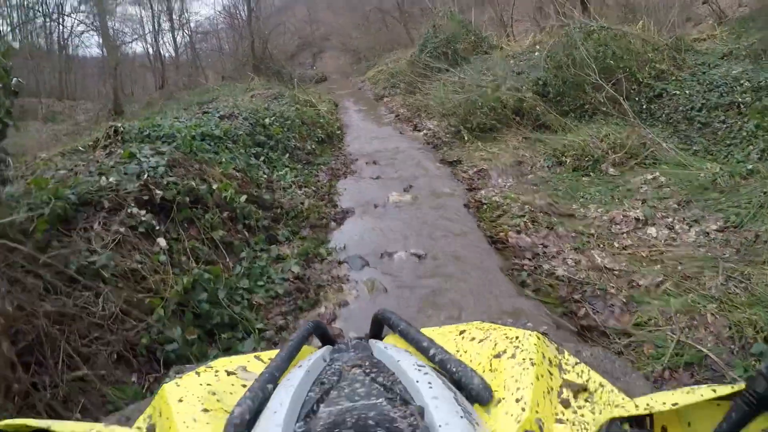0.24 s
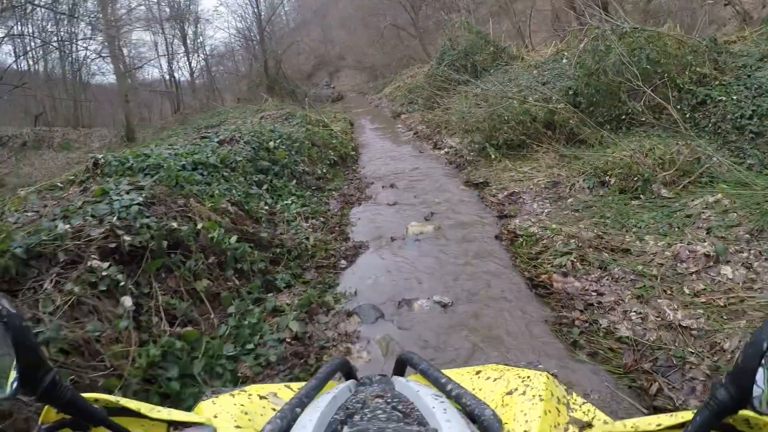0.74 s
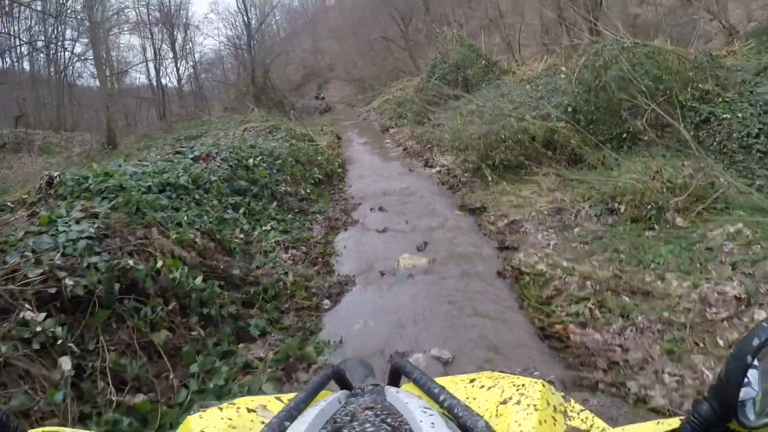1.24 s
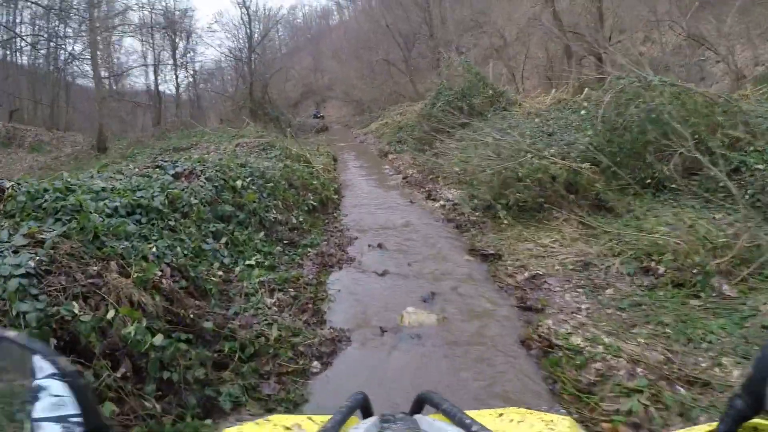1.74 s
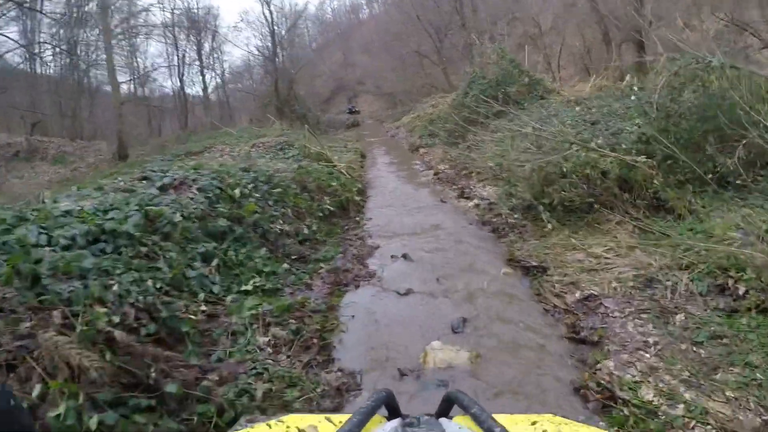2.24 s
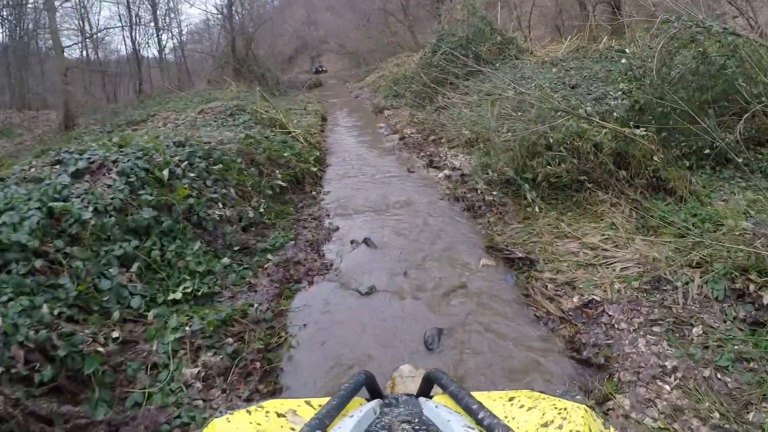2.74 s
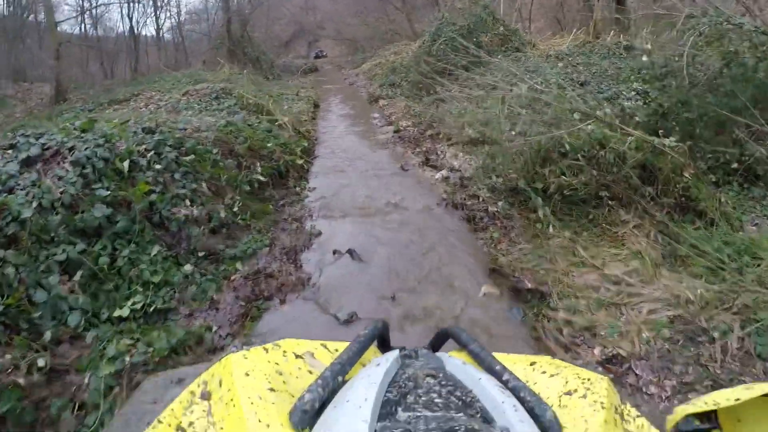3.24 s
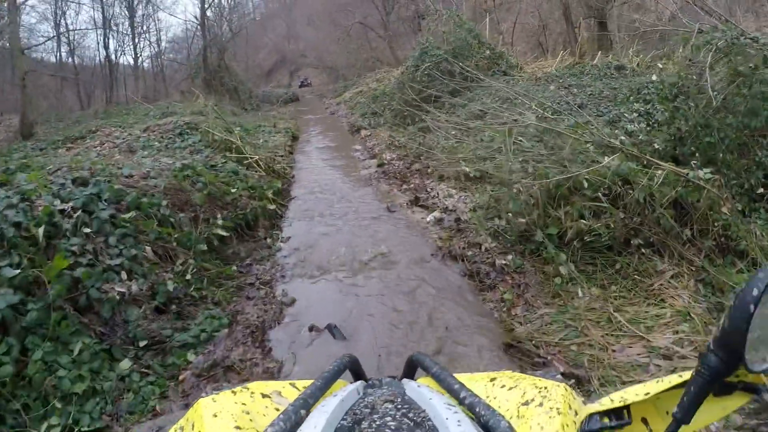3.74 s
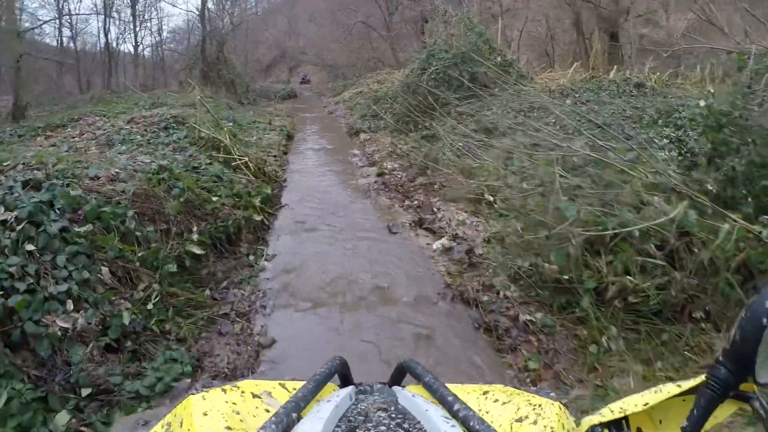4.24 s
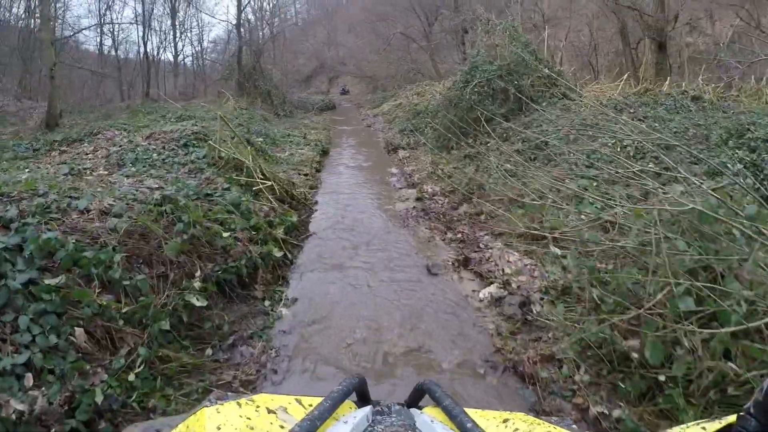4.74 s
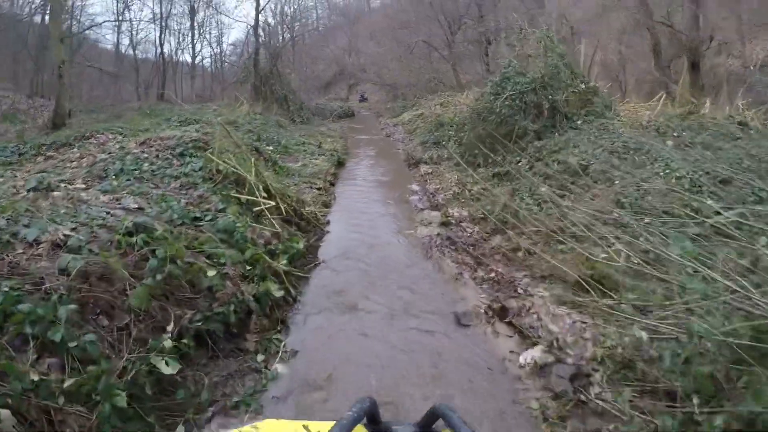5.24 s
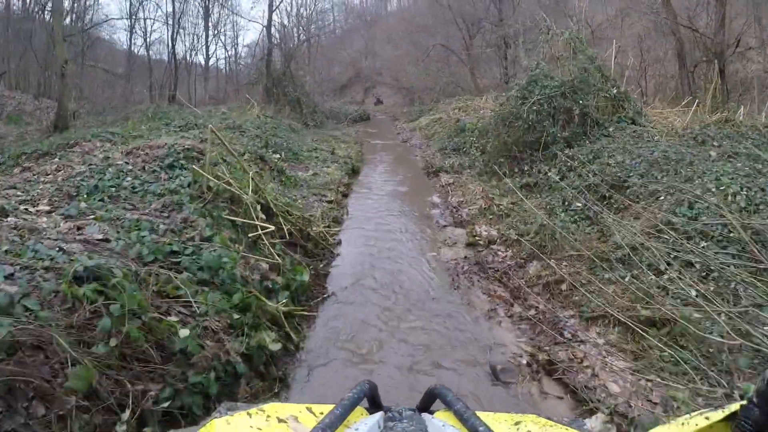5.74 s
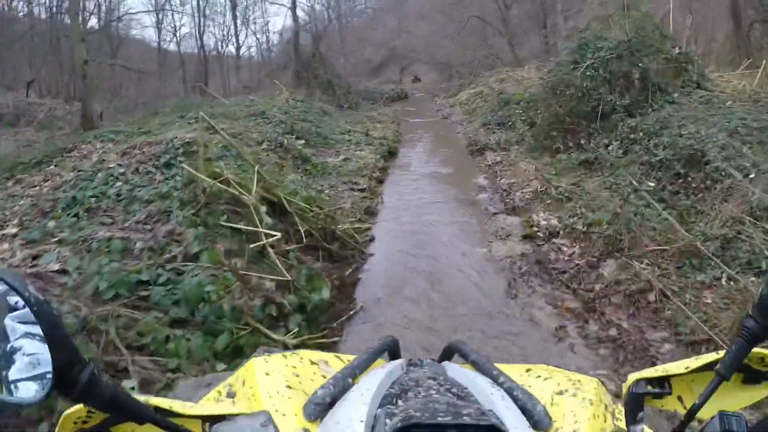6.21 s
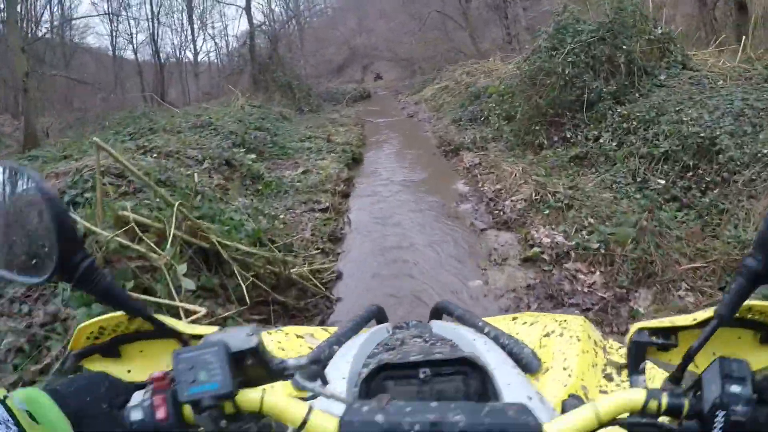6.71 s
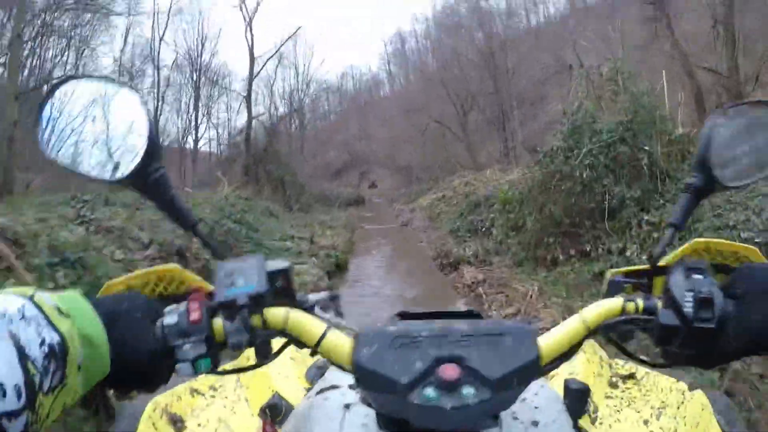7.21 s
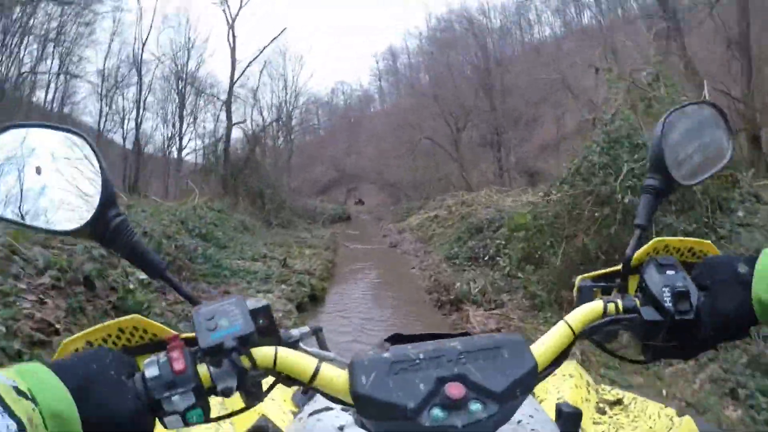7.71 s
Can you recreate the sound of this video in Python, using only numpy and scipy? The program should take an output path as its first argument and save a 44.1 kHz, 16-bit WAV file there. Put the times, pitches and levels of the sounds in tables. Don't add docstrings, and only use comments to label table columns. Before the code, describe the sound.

A quad bike crawls up a shallow muddy woodland stream. A low, uneven engine throb surges and sags with the throttle under a steady wash of churned water. Wheels thud on stones, panels rattle and water slaps the mudguards. In the last few seconds the revs climb and the splashing thickens. The microphone rides on the machine in a sealed housing, close, boxy and muffled.

```python
import sys
import numpy as np
from scipy import signal
from scipy.fft import rfft, irfft, next_fast_len
from scipy.io import wavfile
from scipy.ndimage import uniform_filter1d

SR = 44100
rng = np.random.default_rng(int(sys.argv[2]) if len(sys.argv) > 2 else 0)


def volts_from_decibels(level):
    exponent = np.asarray(level, float) / 20
    return 10 ** exponent


def put_to_file(sound):
    columns = np.atleast_2d(sound).T
    safe = np.clip(columns, -1, 1)
    whole_steps = np.round(safe * 32767)
    wavfile.write(sys.argv[1], SR, whole_steps.astype(np.int16))


N = 351477
TIME = np.arange(N) / SR
SIZE = next_fast_len(N + SR // 4)
HZ = np.maximum(np.arange(SIZE // 2 + 1) * SR / SIZE, 1)


def curves(table):
    s, *columns = np.transpose(table)
    return [np.interp(TIME, s, column) for column in columns]


def over_hz(table):
    hz, *columns = np.transpose(table)
    return [np.interp(np.log(HZ), np.log(hz), column) for column in columns]


def through(x, gain):
    return irfft(rfft(x, SIZE) * gain, SIZE)[..., :N]


def causal(db):
    cepstrum = irfft(np.log(volts_from_decibels(db)), SIZE)
    cepstrum[1:SIZE // 2] *= 2
    cepstrum[SIZE // 2 + 1:] = 0
    return np.exp(rfft(cepstrum))


def band(hz, width):
    return 1 / (1 + 1j * (HZ ** 2 - hz ** 2) / (HZ * width))


def unit(x):
    return x / np.sqrt(np.mean(x ** 2, axis=-1, keepdims=True))


def walk(rate):
    k = int(SR / rate)
    held = np.repeat(rng.standard_normal(N // k + 1), k)
    slewed = uniform_filter1d(uniform_filter1d(held, k), k)
    return unit(slewed[:N])


def bursts(table, rise_s, fall_s, rings=False):
    out, t = np.zeros(N + SR), np.arange(SR // 5) / SR
    shape = (1 - np.exp(-t / rise_s)) * np.exp(-t / fall_s)
    for s, db, *hz in table:
        start = int(s * SR)
        tone = np.sin(2 * np.pi * hz[0] * t) if rings else 1
        out[start:start + len(t)] += volts_from_decibels(db) * shape * tone
    return out[:N]


# start in seconds, four-stroke cycle rate asked for in Hz.
THROTTLE = [(0.0, 13.83), (0.82, 19.53), (1.04, 15.56), (1.44, 18.3), (1.72, 19.6), (2.04, 14.1),
            (2.74, 21.32), (3.24, 15.97), (3.72, 18.11), (4.02, 16.45), (4.37, 18.79), (4.6, 15.25),
            (4.9, 19.5), (5.02, 23.3), (5.17, 19.8), (5.36, 21.2), (5.63, 23.48), (6.32, 24.6),
            (6.57, 26.2), (6.85, 26.95), (7.09, 26.3), (7.52, 27.24), (7.76, 28.3)]
START_HZ, CRAWL_HZ = 17.85, 18
PICK_UP_S, SAG_S = .088, .215


def cycle_hz():
    out, now = np.zeros(N), START_HZ
    for (s, goal), (end, _) in zip(THROTTLE, THROTTLE[1:] + [(N / SR, 0)]):
        start, stop = round(s * SR), round(end * SR)
        since = np.arange(stop - start) / SR
        part = goal + (now - goal) * np.exp(-since / (PICK_UP_S if goal > now else SAG_S))
        out[start:stop] = part
        now = part[-1]
    return uniform_filter1d(out, size=SR // 20)


# multiple of the cycle, left level in dB, right level in dB.
STRONG_ORDERS = [(2, 0, 0), (3, -7, -8), (4, -7, -15.5), (5, -9, -9)]
# multiple of the cycle, left level in dB, right level in dB.
WEAK_ORDERS = [(1, -51, -31), (6, -66, -40.5), (7, -60, -47.5), (8, -52, -46.5), (10, -68, -51),
               (12, -52.5, -54.5)]
WEAK_DB_PER_HZ = 0.03
# frequency in Hz, left level in dB, right level in dB.
MOUNT = [(27.8, -38.5, -37), (32.7, -24, -23), (48.4, -29, -20), (61.4, -33, -40.5), (71.7, -30, -17.5),
         (89.8, -29.5, -15), (106, -63, -14), (128, -36.5, -31)]
# time in seconds, firmness in dB,
# second order at the left in dB, second order at the right in dB.
GRIP = [(0.12, 0.5, -19, 7.5), (0.36, -4, 5, 3), (0.5, 0.5, 0, 8.5), (0.85, -4, -16, -1), (1.0, -1, -2, 6),
        (1.2, -1, -6, 6), (1.55, -3, -8, 0), (1.72, -4, 1, 2), (2.05, 2.5, -6, -4), (2.3, 1, 4, 6.5),
        (2.75, -1, -7, -5.5), (3.05, -6, 11.5, 4), (3.35, -2, 6.5, 5), (3.75, 2, -12, 6.5),
        (4.2, -4, -20, 3), (4.7, -0.5, -6, 11.5), (5.05, 1.5, -2, 8), (5.2, -4.5, 10, 3.5),
        (5.7, -4, 8, -3.5), (6.4, -1, 4, -1.5), (6.7, -1.5, -5, 3.5), (7.3, -3, 2, -2),
        (7.41, 5.5, -8, -12), (7.48, 2, -11, -4), (7.97, -1.5, -3, 5)]
# time in seconds, third, fourth and fifth order in dB.
LOAD = [(0.0, 5, -1, -0.5), (0.3, -3, -6, 0.5), (0.6, -7, 0, 1), (0.8, -2, -8, 3), (1.0, 3, 7, 3.5),
        (1.4, 5, 1, -2), (1.7, 2, 4.5, 4.5), (2.0, 8, 1.5, -5.5), (2.3, -8, 4, -6.5), (2.6, 1, -7, -2.5),
        (2.85, -22, -8, 1), (3.1, 7, 9, 0.5), (3.4, 3, 2, -3), (3.7, 2, 0, -2), (4.0, -3, 2, 1.5),
        (4.5, 4, 2, 4), (4.9, 0, -3, -5), (5.1, -4, -2, 2.5), (5.4, 14, 9.5, 1.5), (5.8, 2, 0, 2.5),
        (6.1, 1.5, 1, -7), (6.5, 0, -3, 1), (6.9, 3, 3.5, -7), (7.4, 1, -0.5, 5.5), (7.97, 2.5, -11, 2)]


def engine():
    hz, (firm_db, left_db, right_db) = cycle_hz(), curves(GRIP)
    turn = 2 * np.pi * np.cumsum(hz * (1 + .005 * walk(9))) / SR
    mount_hz, *passed = np.transpose(MOUNT)

    def mount(side, multiple):
        return np.interp(np.log(multiple * hz), np.log(mount_hz), passed[side]) + firm_db

    extra_db = [(left_db, right_db)] + [(db, db) for db in curves(LOAD)]
    orders = []
    for (k, left, right), (more_left, more_right) in zip(STRONG_ORDERS, extra_db):
        orders.append((k, left + more_left + mount(0, k), right + more_right + mount(1, k)))
    rise_db = WEAK_DB_PER_HZ * (hz - CRAWL_HZ)
    for k, left, right in WEAK_ORDERS:
        orders.append((k, left + (k > 1) * rise_db, right + (k > 1) * rise_db))
    out = 0
    for k, *levels in orders:
        rough_db = 1.2 if k == 2 else 2.7 if k in (3, 4, 5) else 3
        right_lag = 1.18 + (.15 if k == 2 else .5) * walk(1.513)
        lag = np.array([np.zeros(N), right_lag]) + rng.uniform(0, 2 * np.pi)
        gain = []
        for db in levels:
            rough = rough_db * walk(10 if k < 6 else 3)
            gain.append(volts_from_decibels(db + rough + (k > 5) * 1.2 * walk(3)))
        out = out + np.sqrt(2) * np.array(gain) * np.sin(k * turn + lag)
    return out


# time in seconds, rumble level in dB.
BED = [(0.35, -35.5), (0.65, -39), (1.0, -32), (1.35, -38), (1.75, -31.5), (2.35, -41.5), (3.0, -32),
       (3.4, -38), (3.6, -34.5), (4.15, -38), (5.1, -35.5), (5.6, -37.5), (5.9, -30), (6.25, -35.5),
       (6.65, -34.5), (7.0, -30), (7.4, -33), (7.9, -31.5)]
RIGHT_RUMBLE_DB = 4
# frequency in Hz, density in dB per Hz.
RIDE_LEFT = [(15, 22), (30, 20), (60, 11), (110, 5), (160, 1), (230, -1), (400, -1), (490, -14), (750, -23),
             (1500, -60)]
# frequency in Hz, density in dB per Hz.
RIDE_RIGHT = [(15, 16), (30, 15), (60, 10), (110, 5), (160, -1), (230, -7), (400, -12), (490, -18),
              (750, -28), (1500, -60)]
MOUNT_HZ, MOUNT_WIDTH_HZ, MOUNT_DB = 570., 30., -29
STRUT_HZ, STRUT_WIDTH_HZ, STRUT_DB = 324, 59, -12


def ride():
    db = curves(BED)[0] + np.array([[0], [RIGHT_RUMBLE_DB]])
    lumps = rng.standard_normal((2, N)) * volts_from_decibels(np.array([3.0 * walk(20), 2.0 * walk(20)]))
    slow = rng.standard_normal((2, N)) * volts_from_decibels(np.array([2.0 * walk(2.5), 1.0 * walk(3.5)]))
    colour = volts_from_decibels(np.array(over_hz(RIDE_LEFT) + over_hz(RIDE_RIGHT)))
    colour = colour / np.sqrt(np.mean(colour ** 2 * (HZ > 110), axis=1, keepdims=True))
    upper = np.clip(np.log2(HZ / 45), 0, 1)
    rumble = through(unit(lumps), colour * upper) * volts_from_decibels(db - 4.5)
    sway = through(unit(slow), colour * (1 - upper)) * volts_from_decibels(.5 * (db + 35.5) - 36.5)
    ring = unit(through(lumps[0], band(MOUNT_HZ, MOUNT_WIDTH_HZ))) * volts_from_decibels(.7 * db[0] + MOUNT_DB + 8)
    strut = unit(through(lumps[1], band(STRUT_HZ, STRUT_WIDTH_HZ) ** 2)) * volts_from_decibels(db[0] + STRUT_DB)
    swing = np.exp(-TIME / [[.06], [.015]]) * np.cos(2 * np.pi * TIME * [[18], [29]])
    lurch = np.array([[-.37], [-.8]]) * swing
    return rumble + sway + ring * np.array([[1], [-1.1]]) + strut * np.array([[1], [-.4]]) + lurch


# time in seconds, added churn in dB.
DEPTH = [(0.0, -1), (0.2, 1.5), (0.4, 2.5), (0.76, 1), (1.1, 1.5), (1.33, 1.5), (1.9, -1), (2.1, 0),
         (2.4, -1), (2.9, 1), (3.45, 0), (4.4, 1.5), (5.1, -1), (6.4, -0.5), (7.03, 1), (7.4, 1),
         (7.62, -0.5), (7.97, 1)]
# time in seconds, added spray in dB.
SPRAY = [(0.0, 0.5), (0.45, 1), (0.75, 1), (1.1, 0), (1.35, -1.5), (1.75, 0), (2.15, -1.5), (2.6, -2),
         (2.72, 0), (2.8, 0), (3.4, -1.5), (3.9, 0.5), (4.1, -1.5), (4.9, 0), (5.1, -1), (5.65, -3),
         (5.78, 0), (6.3, -0.5), (6.6, 1), (7.97, -1)]
CHURN_DB_PER_HZ, SPRAY_DB_PER_HZ = 0.69, 0.64
SPRAY_STONE_SHARE, WHEELS_SMOOTH_S = .15, .7


def splash():
    faster, depth_db, stones_db = cycle_hz() - CRAWL_HZ, curves(DEPTH)[0], curves(BED)[0]
    churn_db = CHURN_DB_PER_HZ * faster + depth_db
    rolling = uniform_filter1d(faster, size=int(WHEELS_SMOOTH_S * SR))
    spray_db = SPRAY_DB_PER_HZ * rolling + curves(SPRAY)[0] + SPRAY_STONE_SHARE * (stones_db + 45.5)
    size = volts_from_decibels(2.7 * np.minimum(rng.exponential(size=(2, N)), 4))
    drops = (rng.random((2, N)) < 700 / SR) * size
    puffs = signal.lfilter([1], [1, -.975], drops) * rng.standard_normal((2, N))
    spectrum = rfft(rng.standard_normal((2, N)) + 0.57 * unit(puffs), SIZE)
    out, swell = 0, walk(8.8)
    for hz in 450 * 2 ** (np.arange(10) * .55):
        part = np.cos(np.pi / 2 * np.clip(np.log2(HZ / hz) / .55, -1, 1)) ** 2
        high = np.clip(np.log2(hz / 2000.), 0, 1)
        follow = np.clip(hz / 1070.0, .4, 1)
        wash_db = (1 - high) * follow * (churn_db + 0.18)
        top_db = high * (spray_db - .6) * (.55 if hz > 11000 else 1)
        flicker_db = 0.45 * swell + 1.1 * walk(14) + 0.13 * walk(3)
        out = out + volts_from_decibels(wash_db + top_db + flicker_db) * irfft(spectrum * part, SIZE)[:, :N]
    return out


BUZZ_HZ, BUZZ_WIDTH_HZ = 1480, 92
BUZZ_DB, BUZZ_DB_PER_HZ = 0.5, -1.8
BUZZ_CYCLES, BUZZ_PHASE = .25, .28


def buzz():
    hz = cycle_hz()
    cycles = np.cumsum(hz) / SR + BUZZ_PHASE
    size_db = 2 * rng.standard_normal(N // 1000)[cycles.astype(int)]
    level_db = BUZZ_DB + size_db + BUZZ_DB_PER_HZ * (hz - CRAWL_HZ)
    puff = np.exp(-(cycles % 1) / BUZZ_CYCLES) * volts_from_decibels(level_db)
    return np.array([through(puff * rng.standard_normal(N), band(BUZZ_HZ, BUZZ_WIDTH_HZ)), np.zeros(N)])


# start in seconds, length in seconds,
# first frequency in Hz, last frequency in Hz, level in dB.
GURGLES = [(0.0, 0.19, 2085, 2022, 4), (0.926, 0.26, 1557, 1625, -0.5), (1.005, 0.24, 2210, 2125, -3),
           (7.501, 0.54, 2120, 2086, 0), (2.617, 0.31, 1650, 1616, 0), (2.85, 0.15, 2066, 2160, -1),
           (2.958, 0.32, 1675, 1816, -1.5), (4.202, 0.19, 2176, 2050, 0), (4.951, 0.57, 1768, 1740, -4.5),
           (5.706, 0.19, 2160, 2106, -3), (6.545, 0.33, 2245, 2102, 7), (6.858, 0.47, 1626, 1740, 5),
           (6.905, 0.43, 2110, 2215, 5.5), (7.453, 0.6, 1680, 1839, 6.5)]
GURGLE_WIDTH_HZ, GURGLE_DB = 134, -15.5


def gurgle():
    out = np.zeros(N)
    flutter = through(rng.standard_normal((2, N)), 1 / (1 + (2 * HZ / GURGLE_WIDTH_HZ) ** 2))
    flutter = unit(flutter[0]) + 1j * unit(flutter[1])
    for s, length, from_hz, to_hz, db in GURGLES:
        share = np.clip((TIME - s) / length, 0, 1)
        turn = 2 * np.pi * np.cumsum(from_hz + (to_hz - from_hz) * share) / SR
        swell = np.sqrt(np.sin(np.pi * share).clip(0))
        out += volts_from_decibels(db + GURGLE_DB) * swell * np.real(flutter * np.exp(1j * turn))
    return np.array([out, np.zeros(N)])


# start in seconds, level in dB, ring frequency in Hz.
RATTLES = [(0.0324, -25, 2070), (0.0474, -25, 2070), (0.0694, -25, 2010), (0.1186, -25, 1850),
           (0.1394, -25, 2050), (0.2054, -25, 1640), (0.704, -24, 1690), (0.719, -20, 1680),
           (0.641, -23, 1670), (0.498, -22, 1680), (0.937, -22, 1640), (0.4599, -20, 1570),
           (0.5707, -27, 1670), (0.7477, -16, 1550), (0.7891, -17, 1690), (0.8535, -18, 1650),
           (0.8999, -16, 1650), (0.9065, -17, 1680), (0.9657, -21, 1570), (1.4272, -20, 1650),
           (2.0298, -16, 1630), (2.6479, -22, 1650), (2.7172, -16, 1640), (2.7796, -17, 1650),
           (3.0036, -21, 1810), (3.5768, -17, 1730), (5.0804, -23, 1760), (6.3724, -20, 1600),
           (6.5939, -22, 2130), (6.6393, -20, 2170), (6.6618, -20, 2180), (6.7491, -19, 2070),
           (6.8169, -18, 1820), (6.9406, -18, 1650), (7.66, -20, 1710), (0.387, -22, 1690),
           (1.7569, -26, 1640), (2.1321, -25, 2200), (2.5102, -27, 1630), (3.1757, -24, 1820),
           (4.3066, -20, 2060), (5.7104, -23, 1670), (6.3315, -23, 1740), (6.9636, -19, 1620)]
# start in seconds, level in dB, frequency in Hz.
TICKS = [(3.6827, -20, 1590), (3.7416, -29, 1630), (3.9216, -27, 1530), (3.9975, -25, 1650),
         (4.0533, -26, 1570), (4.1377, -35, 1550), (4.195, -20, 1580), (4.2519, -22, 1800),
         (4.3088, -22, 1630), (4.3502, -20, 1600), (4.409, -26, 1550), (4.4654, -20, 1600),
         (4.5632, -25, 1680), (4.5931, -22, 1620), (4.6485, -34, 1760), (4.7084, -23, 1580),
         (4.7672, -20, 1550), (4.9757, -24, 1570), (5.0062, -23, 1594), (5.0486, -21, 1800),
         (1.1028, -25, 1620), (1.2156, -31, 1550), (1.4276, -27, 1660), (1.46, -20, 1680),
         (1.5563, -27, 1670), (1.7149, -23.5, 1680), (1.7578, -35, 1650), (1.8431, -28, 1580),
         (1.9873, -32, 1620), (2.0292, -40, 1570), (2.0686, -32, 1680), (2.1854, -27, 1530),
         (2.3385, -34, 1770), (2.4044, -32, 1720), (2.5106, -25, 1635), (2.5735, -37, 1720),
         (5.2231, -26, 1740), (5.3338, -20, 1570), (5.7104, -34, 1670), (5.8002, -22, 1770),
         (5.89, -30, 1580), (5.9579, -23, 1710), (6.2018, -21, 1640), (6.2457, -23, 1590),
         (6.3001, -21, 1710), (6.3315, -26, 1740), (6.3724, -26, 1600), (6.5934, -20, 2130),
         (6.7331, -20, 2060), (6.8169, -31, 1820), (6.9406, -37, 1650), (7.0654, -15, 1670),
         (7.3123, -17, 1690), (7.4146, -26, 1680), (7.5667, -11.5, 1720), (7.66, -33, 1710),
         (7.7219, -20, 1660), (7.9, -15, 1810)]
TICK_DB = -1
# start in seconds, level in dB, hollow part relative to it in dB.
SLAPS = [(0.387, -52, -34), (0.896, -27.5, 0), (1.075, -36.5, 3), (1.546, -38, -4), (2.029, -37.5, 5),
         (2.947, -37, -79), (3.5785, -35, -7), (3.8814, -49, -26), (3.9933, -35.5, 3), (4.733, -41, -24),
         (0.411, -37, -20), (0.966, -40, -12), (1.365, -41, -20), (2.1285, -40, -18), (2.7102, -45, -18),
         (4.4373, -38, -22), (5.004, -37, 4), (5.751, -41, -25), (7.1194, -30, -24)]


def knocks():
    noise = rng.standard_normal((4, N))
    slaps = np.array(SLAPS)
    panel = RATTLES + [(s, db + TICK_DB, hz) for s, db, hz in TICKS]
    rings = bursts(panel, .0005, .013, rings=True) * volts_from_decibels(1.5 * walk(150))
    puffs = through(noise[0] * bursts(RATTLES, .0005, .008), band(1800, 1200))
    rattle = (rings + 1.5 * puffs) * volts_from_decibels(17.5)
    hollow = bursts(np.c_[slaps[:, 0], slaps[:, 1] + slaps[:, 2]], 0.0011, 0.0079)
    body = through(noise[1] * hollow, band(900, 150) + band(1090, 200)) * volts_from_decibels(53)
    crack = noise[2:] * bursts(slaps[:, :2], 0.002, 0.012)
    crack = through(crack, np.clip(np.log2(HZ / 1500), 0, 1)) * volts_from_decibels(46.5)
    return crack + np.array([rattle + body, np.zeros(N)])


# time in seconds, left level in dB, right level in dB, frequency in Hz.
JOLTS = [(0.445, -24, -13, 370), (0.477, -8.5, -6, 92), (0.582, -33, -19, 140), (1.33, -30, -21, 95),
         (2.257, -28, -24, 130), (2.847, -26, -11.5, 105), (1.053, -21, -16, 113), (1.086, -10.5, -30, 111),
         (1.649, -16, -22, 200), (1.825, -15, -9, 106), (2.046, -16, -13, 128), (3.062, -32, -9, 130),
         (3.073, -19, -14, 130), (3.204, -23, -13.5, 106), (3.507, -21, -34, 110), (3.635, -30, -13, 149),
         (3.731, -17, -43, 290), (4.402, -27, -9, 101), (5.053, -30, -30, 102), (5.108, -39, -28, 130),
         (5.195, -18, -24, 140), (5.804, -29, -18, 109), (5.848, -14, -3.5, 92), (5.91, -11, -8.5, 123),
         (6.175, -13, -10, 109), (6.431, -21, -35, 160), (6.768, -19, -33, 110), (6.867, -26, -22, 109),
         (6.915, -8.5, -8, 160), (6.915, -14.5, -9, 330), (6.935, -16, -34, 210), (6.986, -6, -28, 99),
         (7.326, -14, -9, 120), (7.354, -14, -18, 303), (7.376, -18, -34, 484), (7.519, -25, -16, 94),
         (7.566, -22, -18, 95), (7.63, -22, -27, 330), (7.707, -25, -31, 150), (7.961, -13, -32, 110)]


def jolts():
    out, t = np.zeros((2, N + SR)), np.arange(SR // 10) / SR
    turns = rng.uniform(0, 2 * np.pi, (len(JOLTS), 2))
    for (s, left_db, right_db, hz), turn in zip(JOLTS, turns):
        pitch = np.array([[hz], [min(hz, 125)]])
        cycles = pitch * (t - .02)
        swing = np.exp(-(cycles / 0.62) ** 2) * np.cos(2 * np.pi * cycles + turn[:, None])
        start = int((s - .02) * SR)
        out[:, start:start + len(t)] += volts_from_decibels(np.array([[left_db], [right_db]]) - 3.5) * swing
    return out[:, :N]


# time in seconds, frequency in Hz, level in dB.
WHINES = [
    [(2.8, 840, -60), (3.0, 867, -51), (3.3, 870, -58), (3.4, 850, -55)],
    [(4.95, 850, -54), (5.2, 840, -54), (5.55, 904, -48), (5.75, 940, -46), (5.85, 965, -62)],
    [(6.45, 1100, -45), (6.55, 1120, -46), (6.7, 1230, -48), (6.78, 1265, -69)],
]


def whine():
    out = 0
    for table in WHINES:
        hz, db = curves(table)
        on = (TIME > table[0][0]) & (TIME < table[-1][0])
        gain = on * volts_from_decibels(db + 4.8 * walk(20))
        turn = 2 * np.pi * np.cumsum(hz * (1 + 0.0093 * walk(30))) / SR
        out = out + gain * np.sin(turn)
    return np.sqrt(2) * out * np.array([[1], [-1]])


# frequency in Hz, level in dB.
SHELL = [(250, -0.5), (420, -22), (680, -8.5), (1200, -13), (1900, -10), (2600, -15), (3400, -20),
         (5000, -23.5), (7000, -21.5), (9000, -29), (10750, -37.5), (11050, -45), (12200, -44.5),
         (14500, -51.5)]
# frequency in Hz, width in Hz, height above the colour in dB.
RINGS = [(935, 36, 4), (1140, 62, 8.5), (1196, 50, -9.5), (1358, 73, 4), (1505, 157, 4), (1680, 336, 8.5),
         (2084, 74, 4), (2221, 120, 5.5), (2411, 71, 7), (2815, 76, 1), (2992, 154, 5.5), (5930, 300, 2),
         (7790, 290, 4.5)]
# frequency in Hz, likeness from 0 to 1, lead of the right in radians,
# left minus right in dB.
PORTS = [(640, .9, -3.1, -1.4), (850, .975, -3.1, -1.2), (1150, .85, -2.5, -2), (1350, .92, -1.5, -1.8),
         (1900, .88, -1.0, -3), (2500, .8, 1.3, -7), (2900, .2, 2.4, -4.5), (3500, .3, .9, -3),
         (4450, .2, 1.8, -3.3), (5000, .8, 3.1, -1.2), (5700, .45, 2.2, -1.1), (6600, .65, 3.0, -2.5),
         (8300, .35, 2.2, -1.8), (10000, .4, 0, -1.5), (11200, .15, 0, -2)]


def housing(x):
    peaks_db = sum(peak_db * np.abs(band(hz, width)) ** 2 for hz, width, peak_db in RINGS)
    db = over_hz(SHELL)[0] + peaks_db
    alike, lead, lean_db = over_hz(PORTS)
    alike = np.clip(alike, 0, 1)
    shared = through(x[0], alike * np.exp(1j * lead))
    right = shared + through(x[1], np.sqrt(1 - alike ** 2))
    lean = volts_from_decibels(np.array([lean_db, -lean_db]) / 2)
    return through(np.array([x[0], right]), causal(db) * lean)


# low edge in Hz, high edge in Hz, usual depth in dB,
# wander in dB, wanders per second.
NULLS = [
    (660, 830, -1, 3, 22),
    (830, 980, -1.5, 3.5, 22),
    (4750, 5300, -0.5, 1.2, 12),
]
# centre in seconds, length in seconds.
CLOSED_LOW = [(1.32, .09), (1.97, .05), (2.3, .12), (3.12, .07), (3.32, .1), (4.0, .07), (4.76, .05),
              (5.95, .07), (6.37, .09), (6.56, .07), (7.87, .13)]
# centre in seconds, length in seconds.
CLOSED_HIGH = [(.28, .04), (.42, .08), (1.01, .13), (1.21, .05), (1.37, .11), (3.08, .1), (3.33, .1),
               (3.95, .08), (4.08, .05), (4.35, .09), (5.13, .06), (6.78, .04), (7.6, .05)]
CLOSED_DB = -22


def closing(table):
    return sum(np.clip(3 - 6 * np.abs(TIME - s) / length, 0, 1) for s, length in table)


def cancel(x):
    low_shut, high_shut = closing(CLOSED_LOW), closing(CLOSED_HIGH)
    shut = (.5 * low_shut, low_shut, high_shut)
    for (low, high, depth_db, wander_db, rate), closed in zip(NULLS, shut):
        inside = np.clip(.5 + np.minimum(HZ - low, high - HZ) / 40, 0, 1)
        wander = wander_db * np.clip(walk(rate), 0, 3) ** 2
        gain = volts_from_decibels(depth_db - wander + CLOSED_DB * closed)
        x = x - (1 - gain) * through(x.mean(axis=0), inside)
    return x


def scene():
    shaken = engine() + ride() + jolts() + whine()
    airborne = splash() + buzz() + gurgle() + knocks()
    return cancel(shaken + volts_from_decibels(-19.5) * housing(airborne))


def top_cut(x):
    return signal.sosfilt(signal.butter(12, 14900, fs=SR, output="sos"), x)


def record(dry):
    return top_cut(dry)


dry = scene()
out = record(dry)
put_to_file(out)
```